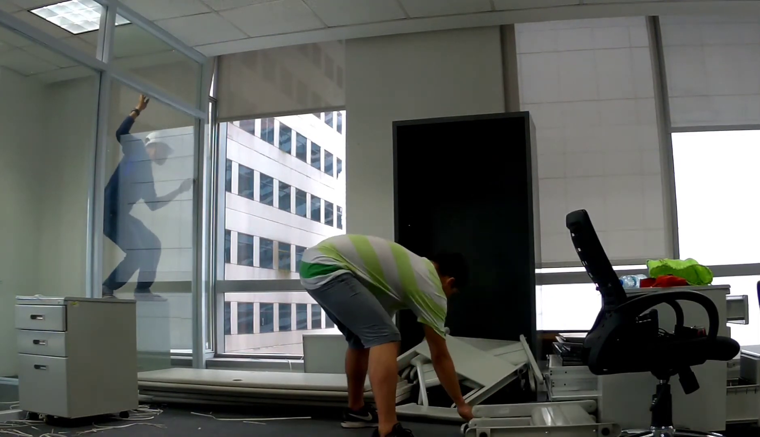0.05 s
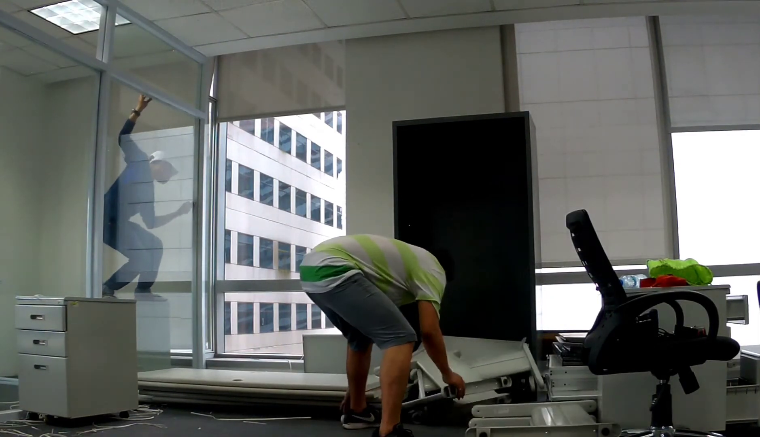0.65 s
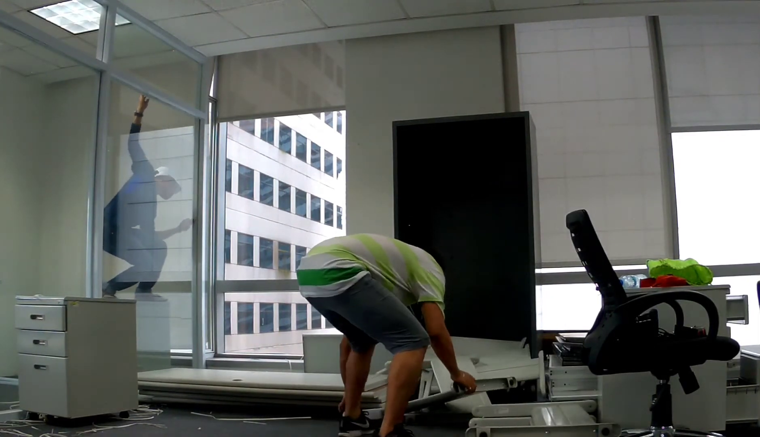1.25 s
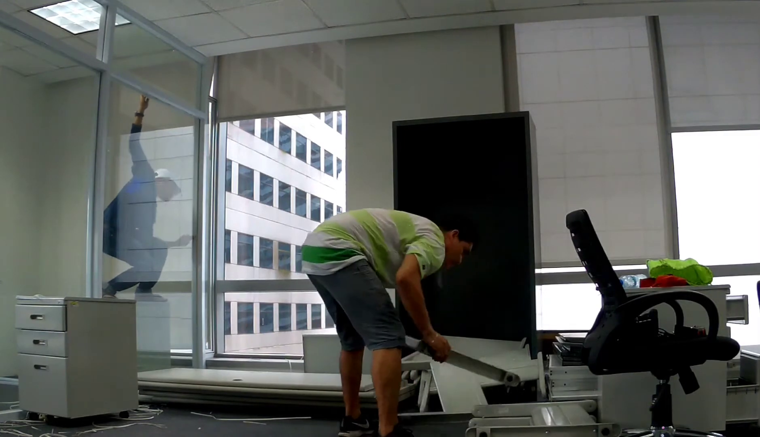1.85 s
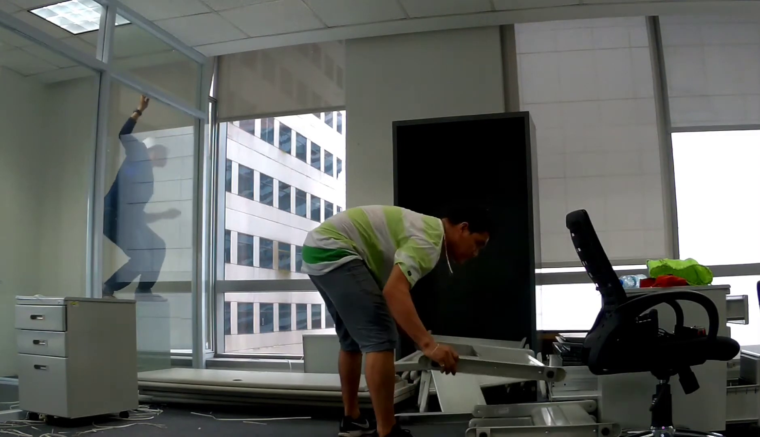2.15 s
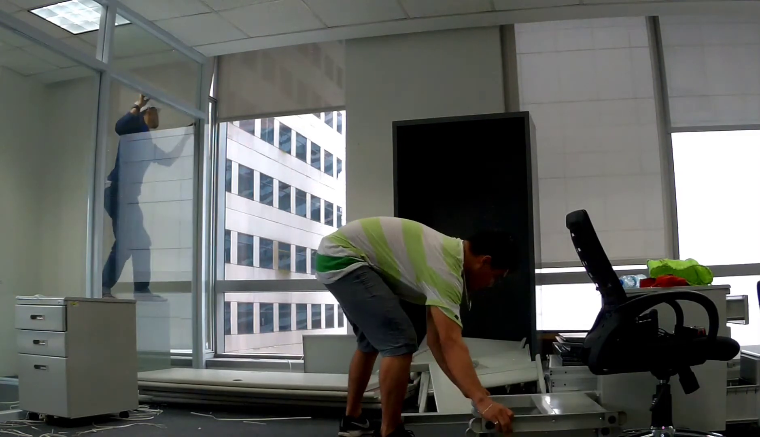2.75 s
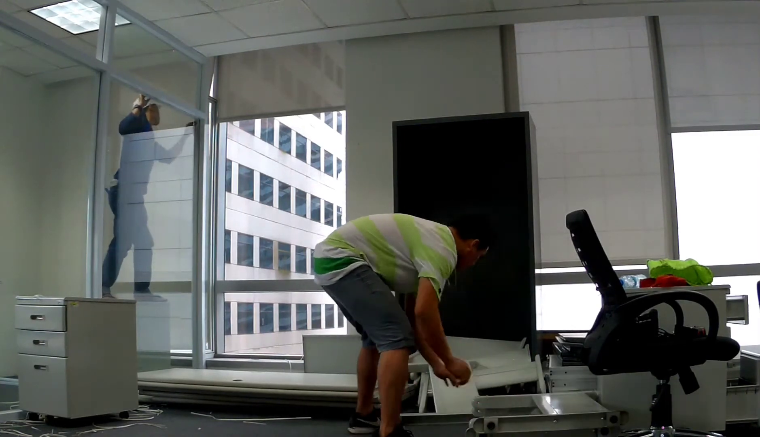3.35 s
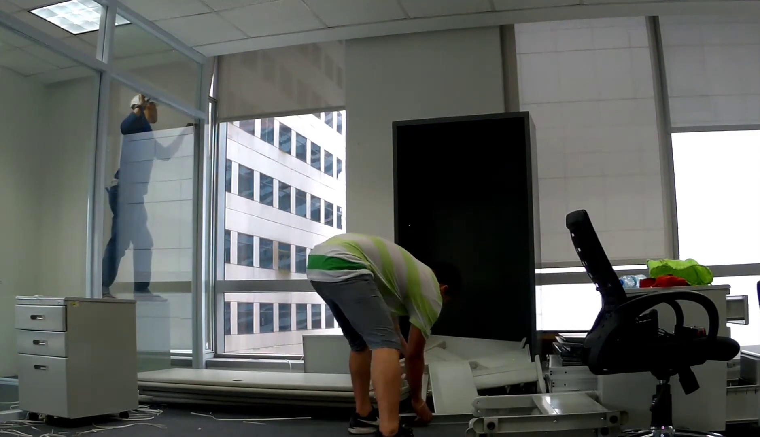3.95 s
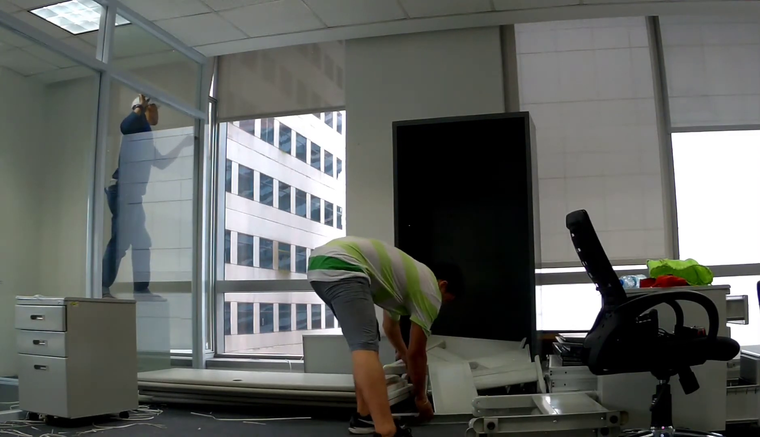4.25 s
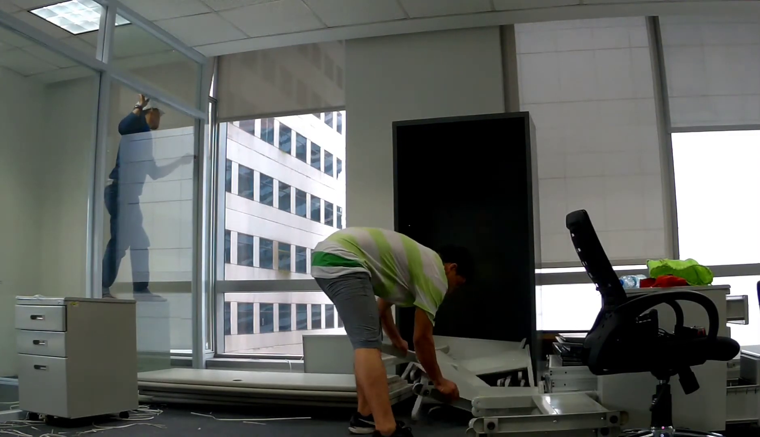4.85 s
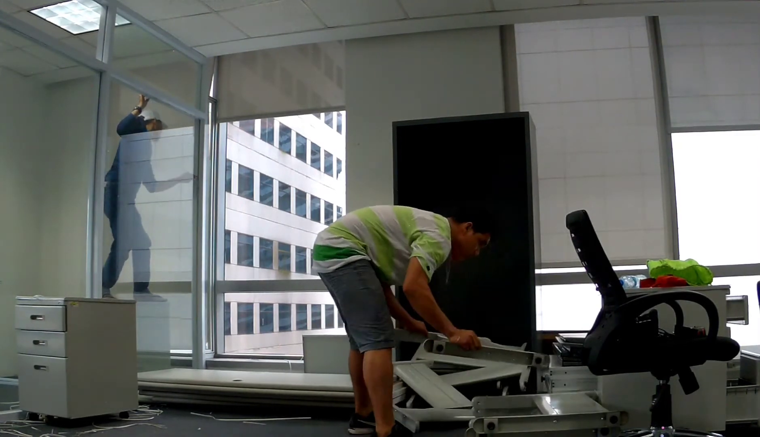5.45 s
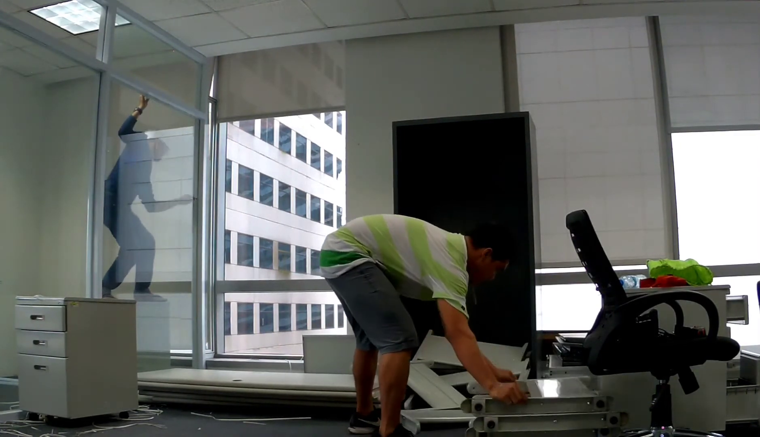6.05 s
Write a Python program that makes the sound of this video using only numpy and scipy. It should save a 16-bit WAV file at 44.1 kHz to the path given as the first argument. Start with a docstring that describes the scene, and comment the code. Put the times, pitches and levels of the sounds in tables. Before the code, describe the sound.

Steel desk frames scrape, squeak and crash onto a stack, ringing briefly in an empty office over a soft ventilation rush.

```python
"""Steel desk frames are pulled from a pile in an empty office, over a soft ventilation rush. A light
scrape and clank open; near 0.8 s a frame drops hard, drags and squeaks, its hollow tubes ringing and its
panels booming into the bare room. After a lull another lands at 2.7 s. From 4.2 s a loose bracket clinks,
three frames crash on the stack amid scrapes and squeaks, and a long drag eases off into one last knock.
Throughout, a gain control squeezes the bangs, and the hardest ones clip."""
import sys
import numpy as np
from scipy import signal
from scipy.fft import rfft, irfft, next_fast_len
from scipy.io import wavfile

SR = 44100
rng = np.random.default_rng(int(sys.argv[2]) if len(sys.argv) > 2 else 0)


def waveform_to_disk(signal):
    """Save audio, clipped to [-1, 1], as 16-bit WAV at the path in sys.argv[1]."""
    frames = np.transpose(np.atleast_2d(signal))
    scaled = np.clip(frames, -1, 1) * 32767
    samples = np.round(scaled).astype(np.int16)
    wavfile.write(sys.argv[1], SR, samples)


N = 269451
RING_TIME = np.arange(SR // 2) / SR  # the half second that one contact rings for


def amp(db):
    """Decibels to gain."""
    return 10 ** (np.asarray(db) / 20)


def unit_rms(x):
    """Scale to rms 1."""
    return x / np.sqrt(np.mean(x ** 2) + 1e-20)


def curve_at(points, hz):
    """Read a curve of (Hz, value) points on a log frequency axis."""
    point_hz, values = np.transpose(points)
    return np.interp(np.log(hz + 1), np.log(point_hz + 1), values)


def add(track, s, sound):
    """Mix a sound into a track at s seconds."""
    start = max(round(s * SR), 0)
    track[start:start + len(sound)] += sound[:N - start]


def noise(spectrum, size):
    """Noise of rms 1, coloured by a curve of (Hz, dB) points."""
    padded = next_fast_len(size)
    colour = amp(curve_at(spectrum, np.fft.rfftfreq(padded, 1 / SR)))
    return unit_rms(irfft(rfft(rng.standard_normal(padded)) * colour, padded)[:size])


def damp(x, decay):
    """Let each frequency die at its own speed, along a curve of (Hz, seconds to fall 60 dB) points."""
    hz, t, bands = signal.stft(x, SR, nperseg=256)
    envelopes = amp(-60 * t / curve_at(decay, hz)[:, None])
    return signal.istft(bands * envelopes, SR, nperseg=256)[1][:len(x)]


def onset(rise_s):
    """An attack that rounds off the front of a hit."""
    return 1 - np.exp(-RING_TIME / rise_s)


def ring(modes):
    """Struck metal: decaying sines, at new strengths and signs for each contact."""
    hz, db, t60 = np.transpose(modes)[:, :, None]
    strength = amp(db + rng.uniform(-4, 4, hz.shape)) * rng.choice([-1, 1], hz.shape)
    return np.sum(strength * amp(-60 * RING_TIME / t60) * np.sin(2 * np.pi * hz * RING_TIME), axis=0)


# The colour of the air bed. Each row: frequency in Hz, relative level in dB.
VENT_SPECTRUM = [(12, -32), (20, -8), (74, 1), (148, -6), (213, -3), (259, -4.5), (306, -10), (427, -9.5),
                 (519, -9), (565, -14), (667, -11.5), (985, -14), (1770, -21.5), (15500, -33.5)]

def ventilation(level_db=-42):
    """A soft, steady rush of air, weighted to the lows."""
    return amp(level_db) * noise(VENT_SPECTRUM, N)


# The bare room's reverb. Each row: frequency in Hz, seconds to fall 60 dB.
REVERB_DECAY = [(80, 1.52), (250, 0.64), (500, 1.18), (1000, 0.88), (2300, 0.76), (5000, 0.64),
                (10000, 0.62), (15000, 0.6)]

def office(x, direct_db, build_up_s=0.004):
    """The direct sound, direct_db above the echo of bare walls and glass, which differs at every spot."""
    t = np.arange(int(1.2 * SR)) / SR
    tail = damp(rng.standard_normal(len(t)), REVERB_DECAY) * (1 - np.exp(-t / build_up_s))
    tail /= np.linalg.norm(tail)
    return amp(direct_db) * np.pad(x, (0, len(tail) - 1)) + signal.fftconvolve(x, tail)


# The floor's dull thud. Each row: frequency in Hz, relative level in dB.
FLOOR_SPECTRUM = [(30, -32), (60, -13), (95, -2), (135, 3), (190, -6), (400, -56), (1500, -71)]
# Bumps on the floor. Each row: start in seconds, relative level in dB.
FLOOR_BUMPS = [(0.864, -20.5), (2.721, -23.5), (4.803, -31), (4.919, -30), (5.072, -21)]

def floor_thumps(gain_db=3, rise_s=0.0066, t60=0.17):
    """Frames bumping down, and probably footsteps; the carpet cushions each to a dull, low thump."""
    out = np.zeros(N)
    for s, db in FLOOR_BUMPS:
        push = noise(FLOOR_SPECTRUM, len(RING_TIME)) * onset(rise_s) * amp(-60 * RING_TIME / t60)
        add(out, s, amp(db + gain_db) * office(push, direct_db=6.5))
    return out


# Short squeals. Each row: start in seconds, length in seconds, pitch in Hz, relative level in dB,
# roughness as a fraction of the pitch.
SQUEAK_CUES = [(0.243, 0.028, 1703, -31, 0.17), (0.659, .04, 1685, -27.5, 0.01),
               (0.703, 0.043, 1563, -34, 0), (1.025, 0.026, 1242, -16, 0.04),
               (1.088, 0.045, 1380, -28.5, 0), (3.654, 0.029, 1258, -44.5, 0.11),
               (4.479, 0.034, 1708, -20.5, .16), (4.8, 0.033, 1611, -24, 0.04),
               (4.931, 0.069, 2223, -23.5, 0.09)]

def squeaks(chatter_db=3):
    """Steel sticks and slips on steel; the slips gather round one pitch in a short rough chirp."""
    out = np.zeros(N)
    flutter_spectrum = [(250, 0), (900, -40)]
    for s, length, hz, db, roughness in SQUEAK_CUES:
        size = int(length * SR)
        jitter, grip = (noise(flutter_spectrum, SR // 4)[:size] for _ in range(2))
        pitch_hz = hz * (1 + roughness * jitter)
        chirp = np.sin(2 * np.pi * np.cumsum(pitch_hz) / SR) * amp(chatter_db * grip)
        chirp *= signal.windows.tukey(size, 0.4)
        add(out, s, amp(db) * office(chirp, direct_db=4.5))
    return out


# A frame's three noise colours: the clang of crowded sheet-metal modes, the low boom of the panel and
# the bright clash of hard edges. Each row: frequency in Hz, relative level in dB.
CLANG_SPECTRUM = [(60, -36), (200, 4), (340, 2), (550, 1.5), (900, 4.5), (1300, 5.5), (1700, 2), (2350, -2),
                  (3000, -14.5), (4500, -27), (9000, -86)]
BOOM_SPECTRUM = [(25, -35), (60, -12.5), (125, -7), (225, 0.5), (290, -2.5), (345, 4), (420, -22.5),
                 (700, -27), (2000, -58)]
CLASH_SPECTRUM = [(1500, 4), (3200, 6.5), (6500, 3.5), (8200, -0.5), (9700, 3), (11000, -6.5),
                  (14000, -8.5), (16000, -45)]
# How long the steel hangs on. Each row: frequency in Hz, seconds to fall 60 dB.
SHEET_DECAY = [(200, 0.42), (1500, 0.22), (4000, 0.23), (12000, 0.31)]
# The hollow tubes' notes. Each row: pitch in Hz, relative level in dB, seconds to fall 60 dB.
TUBE_MODES = [(211.1, -2.5, 0.36), (231, -18, 0.46), (344, 4, 0.19), (352, 1, 0.28), (438.7, 4, 0.27),
              (649.6, 3, 0.14), (855.7, 1.5, 0.23), (962.6, 3, 0.15), (1100, -42, 0.21), (1225, -7, 0.36),
              (1506, 0, 0.21), (1747, -4.5, 0.13), (2350, -5.5, 0.06), (2415, -19, 0.16)]

def frame(boom_db, clash_db, crack_db, tube_db=-13, edge_db=-19, crack_t60=0.043, boom_t60=0.17):
    """A frame's answer to one contact: sheet clang, a clash and crack of edges, panel boom, tube ring."""
    size = len(RING_TIME)
    clang = noise(CLANG_SPECTRUM, size)
    clash = amp(edge_db + clash_db) * noise(CLASH_SPECTRUM, size)
    steel = damp(clang + clash, SHEET_DECAY) * onset(rise_s=0.0014)  # the blow spreads through the frame
    crack = amp(crack_db + clash_db - 60 * RING_TIME / crack_t60) * noise(CLASH_SPECTRUM, size)
    swing = amp(-60 * RING_TIME / boom_t60) * onset(rise_s=0.0073)  # the heavy panel is slow to move
    boom = swing * noise(BOOM_SPECTRUM, size)
    boom *= amp(boom_db) * np.linalg.norm(swing) / np.linalg.norm(boom)
    return steel + crack + boom + amp(tube_db) * ring(TUBE_MODES)


def blow(db, boom_db, clash_db, direct_db, crack_db=-5, hardness=0.75):
    """One hit on a frame, heard in the room; the harder the hit, the sharper its crack."""
    return amp(db) * office(frame(boom_db, clash_db, crack_db + hardness * db), direct_db)


# The loose bracket's notes. Each row: pitch in Hz, relative level in dB, seconds to fall 60 dB.
BRACKET_MODES = [(347, -7.5, 0.38), (796, -2.5, 0.13), (874, -19, 0.36), (953, -8.5, 0.3),
                 (1207, -7.5, 0.46), (1250, 1, 0.063), (1748, -15.5, 0.3), (1980, -14, 0.13),
                 (2310, -29, 0.15)]
# Nudges as a frame is gripped. Each row: start in seconds, relative level in dB.
BRACKET_NUDGES = [(4.212, -28), (4.238, -34.5), (4.293, -35)]

def bracket_clinks(gain_db=-2, touch_s=0.0014, clang_db=-9):
    """Soft touches ring a loose bracket and barely stir the frame."""
    out = np.zeros(N)
    for s, db in BRACKET_NUDGES:
        bracket = ring(BRACKET_MODES)
        clang = amp(clang_db) * damp(noise(CLANG_SPECTRUM, len(RING_TIME)), SHEET_DECAY)
        clink = (bracket + clang) * onset(touch_s)
        add(out, s, amp(db + gain_db) * office(clink, direct_db=-2.5))
    return out


# Drags of frame over frame. Each row: start in seconds, length in seconds, opening and closing
# pressure in relative dB.
DRAG_STROKES = [(0.055, 0.17, -40, -43), (0.425, 0.34, -35, -24.5), (0.834, 0.11, -5.5, -18),
                (1.186, 0.094, -50, -36), (3.918, 0.038, -37, -43), (4.478, 0.17, -10.5, -30),
                (4.794, 0.1986, -14, -12.5), (5.115, 0.056, -7, -17.5), (5.262, 0.54, -19.5, -34)]

def drag_pressure(grab_s=0.038, release_s=0.022):
    """Each stroke takes hold, bears down or eases off steadily, and lets go."""
    t = np.arange(N) / SR
    out = np.zeros(N)
    for s, length, start_db, end_db in DRAG_STROKES:
        held = np.clip((t - s) / grab_s, 0, 1) * np.clip(1 - (t - s - length) / release_s, 0, 1)
        out += held * amp(np.interp(t, [s, s + length], [start_db, end_db]))
    return out


def scraping(slips_per_s=170, uneven_db=5, gain_db=-1, stretches=45):
    """Dragging is a run of tiny uneven slips; the ring changes as the contact moves along the frame."""
    slips = rng.random(N) < slips_per_s / SR
    strength = amp(uneven_db * np.clip(rng.standard_normal(N), -2, 2))
    force = unit_rms(slips * strength) * amp(gain_db) * drag_pressure()
    out = np.zeros(N)
    for stretch in np.array_split(np.arange(N), stretches):
        if force[stretch].max() > amp(-40):
            body = frame(boom_db=0, clash_db=-2, crack_db=-9, tube_db=-11.5)
            scrape = signal.fftconvolve(force[stretch], body / np.linalg.norm(body))
            add(out, stretch[0] / SR, office(scrape, direct_db=-3))
    return out


# Single knocks. Each row: start in seconds, relative level in dB, boom trim in dB, clash trim in dB.
FRAME_KNOCKS = [(.338, -24.5, -6, -4.5), (1.013, -16, -60, 3), (1.07, -23, -12, 0), (1.631, -45, -13, -14),
                (2.658, -20, -6, -2.5), (3.054, -31.5, 4, 3), (3.938, -41.5, -18, -5),
                (4.093, -47, -19, -4), (4.615, -22.5, -3, -2), (4.838, -18.5, 6.5, -2.5),
                (5.765, -28, 9.5, -8)]

def knocks(gain_db=2):
    """Single steel knocks: stray hits, and late bounces as dropped frames settle."""
    out = np.zeros(N)
    for s, db, boom_db, clash_db in FRAME_KNOCKS:
        add(out, s, blow(db + gain_db, boom_db, clash_db, direct_db=-1.5))
    return out


# Drops on the stack. Each row: start in seconds, lag of the second corner in seconds, relative level
# in dB, boom trim in dB, clash trim in dB, direct sound over reverb in dB, loss per rebound in dB.
FRAME_DROPS = [(.239, .012, -27, 0.5, -12, -1.5, 5), (.798, .024, -13, -4, -1.5, -1, 6),
               (2.701, .016, -14, 6.5, 2.5, 0.5, 4.5), (4.466, 0.033, -12.5, 2, -2, -3.5, 36),
               (5.081, .017, -12, 2.5, 1.5, -7, 20), (5.330, 0.0051, -16, 11, 6.5, 5.5, 3.5)]

def landings(gain_db=2.5, rebounds=4, first_gap_s=0.105, gap_ratio=0.8):
    """Two corners strike in quick succession; the frame then rocks, each rebound sooner and weaker."""
    out = np.zeros(N)
    rebound_delays = np.cumsum(first_gap_s * gap_ratio ** np.arange(rebounds))
    for s, lag, db, boom_db, clash_db, direct_db, loss_db in FRAME_DROPS:
        hit_db = db + gain_db
        # the first corner carries less of the weight
        add(out, s, blow(hit_db - 1, boom_db + 0.5, clash_db, direct_db))
        add(out, s + lag, blow(hit_db, boom_db, clash_db, direct_db))
        # rebounds are duller and heard mostly through the room
        for k, delay in enumerate(rebound_delays, 1):
            rebound_db = hit_db - 0.5 - k * loss_db
            add(out, s + delay, blow(rebound_db, boom_db, clash_db - 4.5, direct_db=-3.5))
    return out


def scene():
    """The mono mix: frames being handled, over the ventilation."""
    handling = landings() + knocks() + floor_thumps() + bracket_clinks() + scraping() + squeaks()
    return (handling + ventilation())[None]


def smooth(x, seconds):
    """A running average that forgets the past."""
    keep = np.exp(-1 / (seconds * SR))
    return signal.lfilter([1 - keep], [1, -keep], x)


def gain_control(x, knee_db=-12, memory_s=0.075, attack_s=0.0078, squeeze=0.3):
    """The gain falls as the recent power passes the knee, too late for the start of a bang."""
    power = smooth(smooth(x ** 2, memory_s), attack_s)
    return x * (1 + power / amp(knee_db) ** 2) ** -squeeze


def record(dry, low_cut_hz=45, ceiling=0.66, top_hz=15750):
    """A small microphone's chain: low cut, gain control, a clipping input stage and a band limit."""
    low_cut = signal.butter(1, low_cut_hz, "high", fs=SR, output="sos")
    squeezed = gain_control(signal.sosfilt(low_cut, dry))
    clipped = squeezed / (1 + np.abs(squeezed / ceiling) ** 8) ** (1 / 8)
    padded = next_fast_len(N + SR // 2)
    passband = np.fft.rfftfreq(padded, 1 / SR) < top_hz
    return irfft(rfft(clipped, padded) * passband, padded)[:, :N]


dry = scene()
out = record(dry)
waveform_to_disk(out)
```